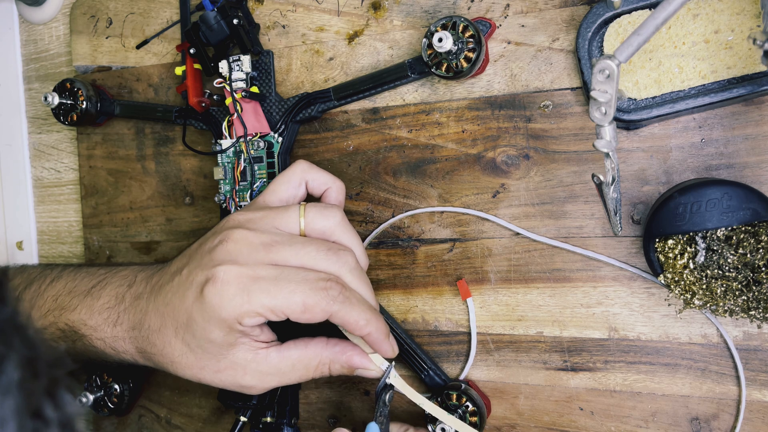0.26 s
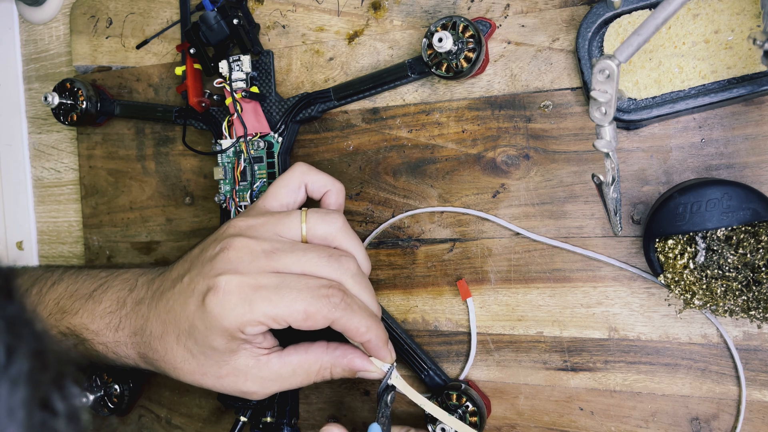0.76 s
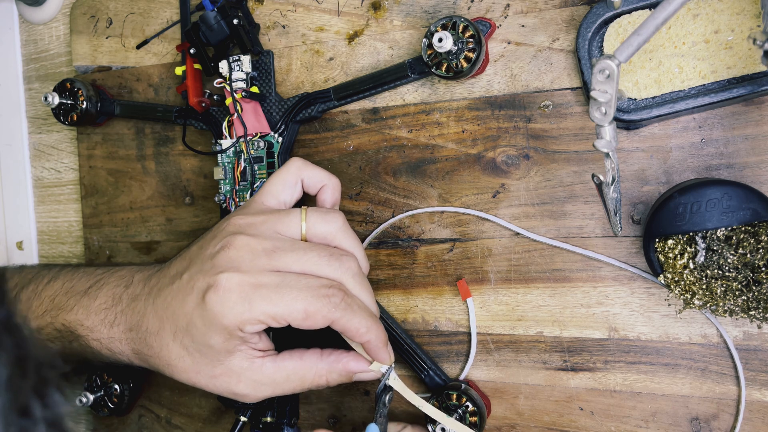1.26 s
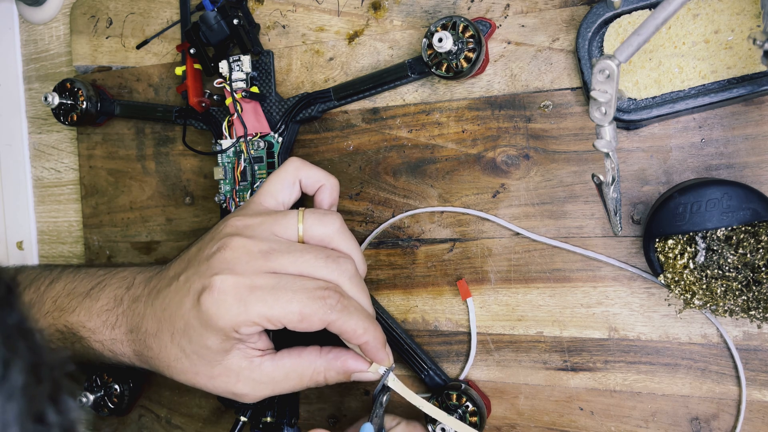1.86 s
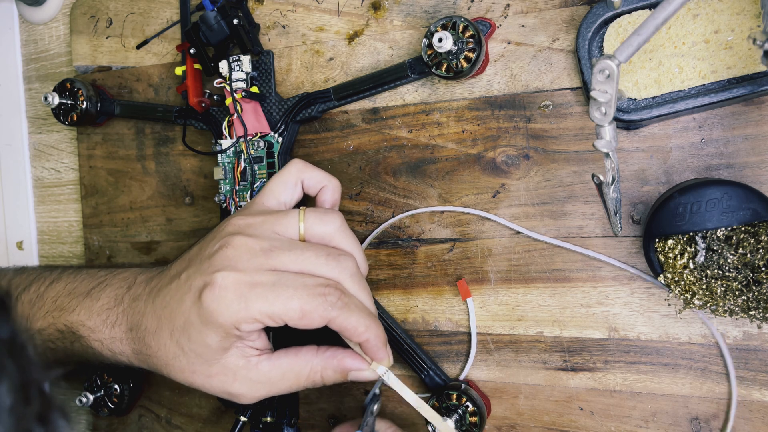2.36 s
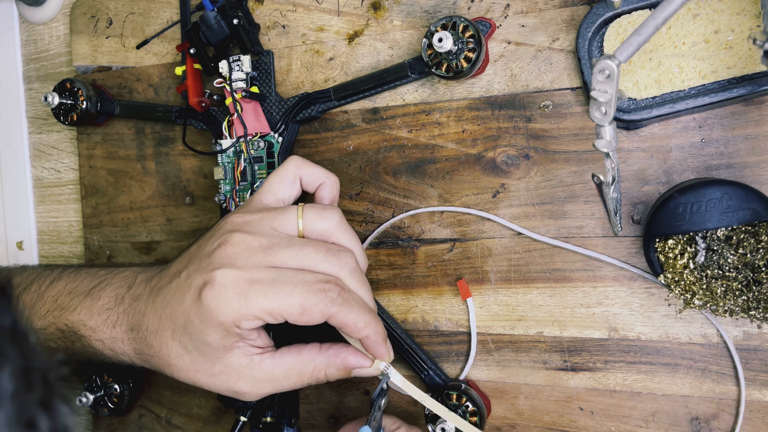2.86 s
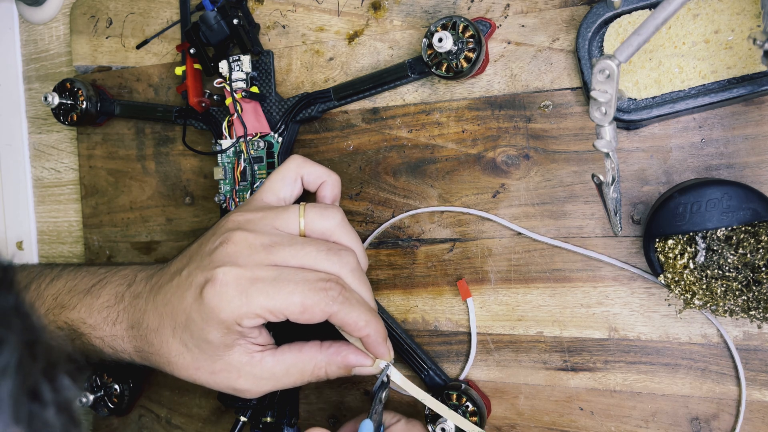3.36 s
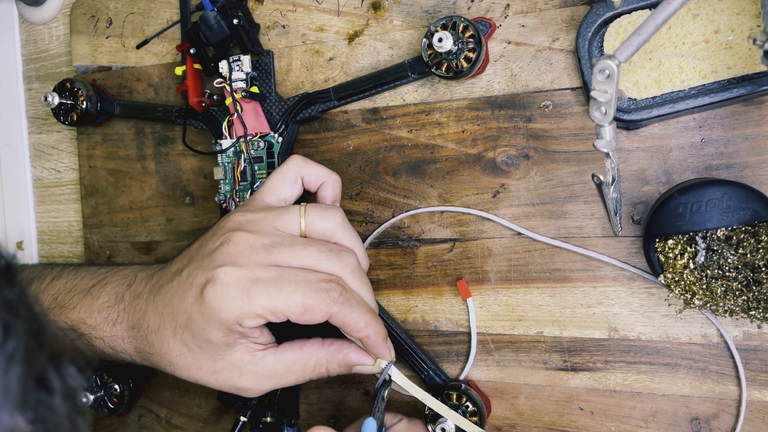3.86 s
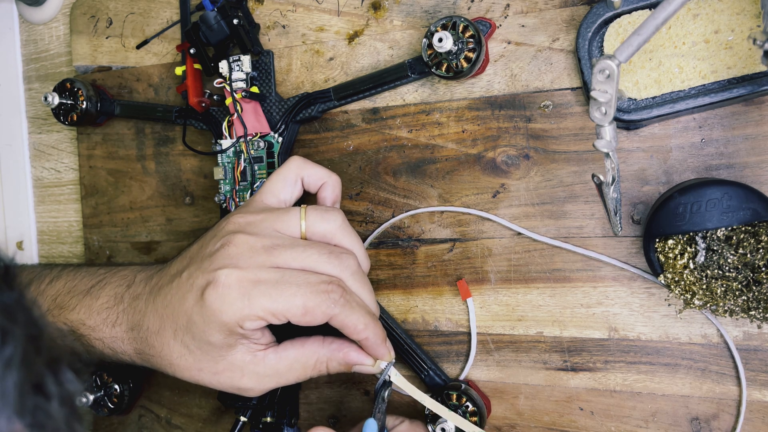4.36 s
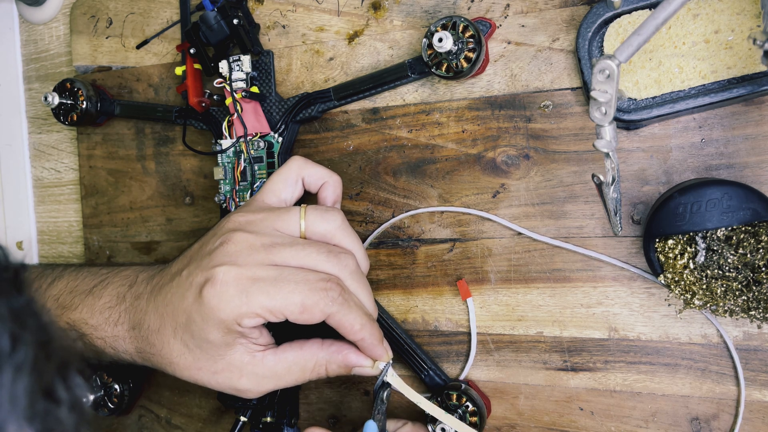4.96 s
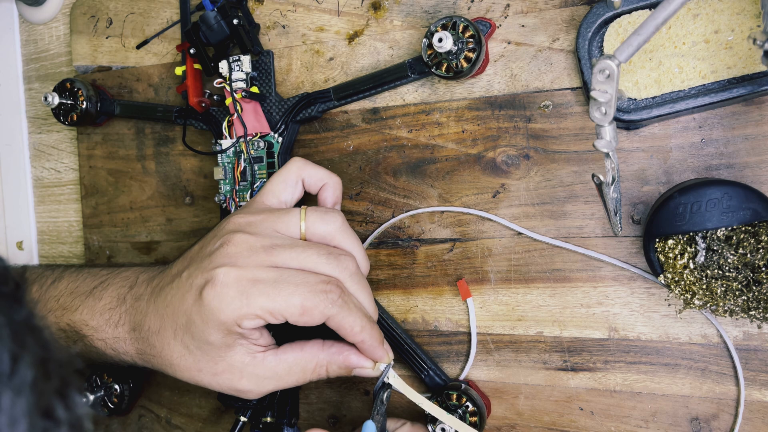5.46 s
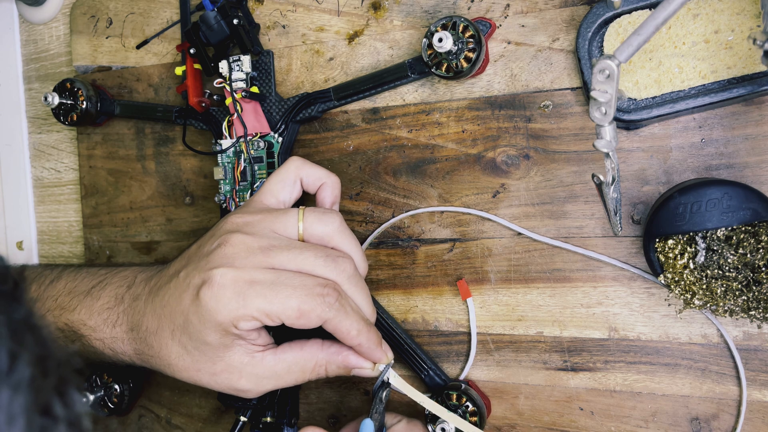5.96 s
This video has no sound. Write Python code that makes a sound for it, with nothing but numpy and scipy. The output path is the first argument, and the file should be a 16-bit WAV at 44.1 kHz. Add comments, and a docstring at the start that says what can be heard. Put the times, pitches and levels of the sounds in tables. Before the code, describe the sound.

A low, slightly throbbing electrical hum and a small fan's whirr run steadily in a quiet workshop. Close to the microphone, steel tweezers tick and tap faintly on a small part, with one sharper click about a second in. A faint slide follows, then soft hand scuffs, bumps and light hollow knocks of a frame on the bench. A few more tiny taps come near the end.

```python
"""Tweezers at a workshop bench

Mains hum and running motors beat against each other in a quiet room, over the whirr of a small fan.
Near the stereo microphone, steel tweezers tick, tap and slide faintly on a part, ringing its modes.
A hand shifts it with soft scuffs and bumps, and its light frame knocks hollowly on the bench.
Ticks, taps and knocks arrive with one reflection off the bench top and a short room tail."""
import sys
import numpy as np
from scipy import signal
from scipy.fft import rfft, irfft, next_fast_len
from scipy.io import wavfile
from scipy.ndimage import uniform_filter1d

SR = 44100
rng = np.random.default_rng(int(sys.argv[2]) if len(sys.argv) > 2 else 0)


def generate_wav(signal):
    """Clip the signal to [-1, 1] and save it as 16-bit WAV at the path in sys.argv[1]."""
    frames = np.transpose(np.atleast_2d(signal))
    scaled = np.clip(frames, -1, 1) * 32767
    pcm = np.round(scaled).astype(np.int16)
    wavfile.write(sys.argv[1], SR, pcm)


N = 274743
TIME = np.arange(N) / SR


def gain_of(db):
    """Decibels to amplitude."""
    return 10 ** (np.asarray(db) / 20)


def unit_rms(x):
    """Scales to an rms of one."""
    return x / np.sqrt(np.mean(x ** 2) + 1e-30)


def curve_at(points, hz):
    """Joins (Hz, value) points on a log-frequency axis."""
    point_hz, value = np.transpose(points)
    return np.interp(np.log(hz + 1), np.log(point_hz + 1), value)


def add(mix, start_s, sound):
    """Mixes a stereo sound in at start_s."""
    span = mix[:, round(start_s * SR):][:, :sound.shape[1]]
    span += sound[:, :span.shape[1]]


def noise(spectrum):
    """Stereo noise of the given dB per Hz, falling steeply above the last point."""
    # likeness of the microphone's two sides, high in the bass: frequency_hz, correlation
    likeness = [(35, 0.7), (150, 1), (270, 0.67), (570, 1), (1200, -0.13), (2200, 0.74), (2900, -0.3),
                (3800, 0.59), (4900, -0.48), (6100, 0.9), (7300, 0.031), (9100, -0.75), (10600, 0.52)]
    size = next_fast_len(N)
    hz = np.fft.rfftfreq(size, 1 / SR)
    colour = gain_of(curve_at(spectrum, hz)) / np.maximum(hz / spectrum[-1][0], 1) ** 10
    mid, side = rfft(rng.standard_normal((2, size))) * np.sqrt(SR) / 2
    correlation = np.clip(curve_at(likeness, hz), -1, 1)
    mid, side = mid * np.sqrt(1 + correlation), side * np.sqrt(1 - correlation)
    return irfft(np.array([mid + side, mid - side]) * colour, size)[:, :N]


def drift(fastest_hz):
    """Slow random wandering of unit rms."""
    rates = np.geomspace(fastest_hz / 10, fastest_hz, num=10)
    return unit_rms(sum(np.sin(2 * np.pi * (hz * TIME + rng.random())) / np.sqrt(hz) for hz in rates))


def hum(waver_rad=0.02, lag_s=0.0001):
    """Nearly pure tones of the mains and motors, whose close spacing makes the hum throb."""
    # the mains (first row), then each motor: rate_hz, [(multiple, rms_db), ...]
    machines = [ (50.025, [(1, -61.9), (2, -36.4)]), (30.08, [(1, -52.8), (1.5, -55.9), (2, -51.3),
                (3, -61.7)]), (29.997, [(16, -68.1), (17, -65)]), (48.18, [(1, -47.7), (3, -64.9)]),
                (38.48, [(2, -53.7), (3, -63.5)]), (33.94, [(2, -61.7)]), (54.43, [(2, -49.6)]),
                (63.0, [(1, -61.6), (2, -61.4), (4, -74.8)])]
    tones = [(rate * multiple, db) for rate, orders in machines for multiple, db in orders]
    phases = rng.uniform(0, 2 * np.pi, len(tones))
    waver = waver_rad * drift(fastest_hz=0.78)
    arrival = TIME + lag_s * np.array([[-1], [1]])  # reaches the right side a little sooner
    return np.sqrt(2) * sum(gain_of(db) * np.sin(2 * np.pi * hz * arrival + phase + waver)
                            for (hz, db), phase in zip(tones, phases))


def room_tone(swell_db=1.06):
    """Machine rumble, the gently swelling whirr of the fan, and hiss."""
    # low noise of the machines: frequency_hz, density_db
    rumble = [(15, -97.5), (28, -79.1), (38, -70.8), (48, -66.1), (75, -68.4), (100, -67.3), (122, -67.5),
              (134, -73.0), (146, -70.4), (166, -69.9), (186, -79), (250, -85.6), (330, -88.2),
              (420, -84.6)]
    # the fan's air noise, peaking in its housing: frequency_hz, density_db
    whirr = [(250, -120), (450, -85.5), (492, -74.5), (552, -71.5), (592, -74.5), (637, -79.5), (692, -86),
             (785, -92), (885, -99.5), (1010, -102.5)]
    # faint hiss: frequency_hz, density_db
    hiss = [(1150, -100.5), (1400, -104.4), (1750, -108.6), (2250, -108.2), (2900, -109.1), (3800, -109.5),
            (4900, -111.6), (5900, -111.9), (7200, -109.7), (8200, -111.8), (9100, -115), (10600, -115),
            (11300, -123)]
    swell = gain_of(swell_db * drift(fastest_hz=6.1))
    return noise(rumble) + swell * noise(whirr) + noise(hiss)


def favour(modes, bright_hz, focus_db):
    """Each mode's share of a contact: down by focus_db per octave squared away from bright_hz."""
    octaves = np.log2(np.transpose(modes)[0] / bright_hz)
    return gain_of(-focus_db * octaves ** 2)


def strike(modes, shares, scrape_ms, spread_rad, grit, rise_ms, pitch=1):
    """A blow and a tiny scrape drive damped modes, each by its share; the click peaks at one."""
    t = np.arange(4096) / SR
    hz, width_hz, db = np.transpose(modes)[:, :, None]
    age = t / (scrape_ms / 1000)
    scrape = rng.standard_normal(len(t)) * age * np.exp(-2 * age)
    force = (t == 0) + grit * scrape / np.linalg.norm(scrape)
    envelope = shares[:, None] * gain_of(db) * np.exp(-np.pi * width_hz * t)
    envelope *= np.minimum(t / (rise_ms / 1000), 1)
    phase = 2 * np.pi * hz * pitch * t
    ring = np.array([(envelope * np.sin(phase + side * spread_rad)).sum(0) for side in (-1, 1)])
    click = signal.fftconvolve(ring, force[None], axes=1)
    return click / abs(click).max()


def reflections(x, echo_s, echo_db, room_db, t60_s):
    """The microphone hears the direct sound, one bounce off the bench top, then the room's tail."""
    t = np.arange(SR // 3) / SR
    tail = rng.standard_normal((2, len(t))) * gain_of(-60 * t / t60_s) * (t > echo_s)
    response = gain_of(room_db) * tail / np.linalg.norm(tail[0])
    response[:, 0] += 1
    response[:, round(echo_s * SR)] += gain_of(echo_db)
    return signal.fftconvolve(x, response, axes=1)[:, :N]


def tweezer_ticks():
    """The steel tips click grittily; the grip shifts their pitch."""
    # clicks of the tips: start_s, dry_peak_db, scrape_ms, bright_hz, focus_db_per_octave2, pitch_ratio
    ticks = [(0.1352, -41.5, 3, 11000, -0.5, 1.02), (0.1428, -37, 1.8, 10000, -2.5, 1.02),
             (0.1495, -41, 2.7, 11000, 3, .975), (1.1029, -23.5, 1, 11600, 34, 1.024),
             (1.109, -43, 1.4, 9500, 6, .99), (2.0855, -55, 1, 7300, 124, 0.93),
             (2.3256, -31, 2.9, 6430, 2, 0.98), (2.347, -46, 2.5, 4000, 8, 1),
             (2.351, -49, 19, 10200, 45, 0.93), (5.663, -45, 2.2, 8050, 52, 0.995)]
    # resonances of the tips: pitch_hz, width_hz, level_db
    tip_modes = [(3150, 400, -11), (4100, 400, -9), (7100, 350, -14), (7900, 330, -6), (9650, 400, -6),
                 (10450, 430, 6), (10950, 420, 4), (12000, 400, -12)]
    out = np.zeros((2, N))
    for start_s, peak_db, scrape_ms, bright_hz, focus_db, pitch in ticks:
        shares = favour(tip_modes, bright_hz, focus_db)
        tick = strike(tip_modes, shares, scrape_ms, spread_rad=0.99, grit=2.7, rise_ms=0.7, pitch=pitch)
        add(out, start_s, gain_of(peak_db) * tick)
    return reflections(out, echo_s=0.0023, echo_db=-9, room_db=-14, t60_s=0.13)


def tweezer_taps():
    """Duller taps on the held part spare modes with a node at the contact; the grip shifts the pitch."""
    # taps along the part: start_s, dry_peak_db, bright_hz, focus_db_per_octave2, place_0_1, pitch_ratio
    taps = [(0.3205, -53.5, 3050, 120, .25, 1.03), (0.724, -38.5, 2500, 6.5, 0.315, 1.01),
            (1.1083, -44, 6100, 60, .29, 1.16), (1.296, -58.5, 3400, 28, 0.25, .92),
            (1.4275, -56.5, 3000, 130, .25, 0.94), (2.0837, -47, 2000, 17, .5, .935),
            (4.653, -38.5, 5600, 2.5, 0.21, 1.018), (4.6926, -46, 3220, 19, 0.37, 0.95),
            (4.818, -54.5, 3500, -2, .4, 1.03)]
    # resonances of the part: pitch_hz, width_hz, level_db
    part_modes = [(2260, 170, -1), (3000, 260, -9), (4030, 340, 4), (4620, 380, 2), (5330, 220, 1),
                  (6380, 480, 6), (6680, 520, 5), (8500, 480, -7)]
    orders = 1 + np.arange(len(part_modes))
    out = np.zeros((2, N))
    for start_s, peak_db, bright_hz, focus_db, place, pitch in taps:
        shares = favour(part_modes, bright_hz, focus_db) * abs(np.sin(np.pi * place * orders))
        tap = strike(part_modes, shares, scrape_ms=0.91, spread_rad=0.53, grit=0.39, rise_ms=1.25,
                     pitch=pitch)
        add(out, start_s, gain_of(peak_db) * tap)
    return reflections(out, echo_s=0.0041, echo_db=-8.5, room_db=-7, t60_s=0.14)


def grains(depth_db, samples):
    """The fast random flutter in level that makes friction grainy."""
    return gain_of(depth_db * unit_rms(uniform_filter1d(rng.standard_normal(N), size=samples)))


def hand_scuffs(rise_share=0.11):
    """The shifting hand rubs in short grainy strokes that rise quickly and fade; the first, brief stroke
    instead gives a loud tick of the tips its low body."""
    # strokes of the hand, after a first brief one that is the low body of the tick at 1.1 s: start_s, length_s,
    # level_db, tilt_db_per_octave
    scuffs = [(1.104, 0.013, -58, -6), (2.089, 0.097, -60.5, 3), (2.196, 0.097, -65, 0),
              (2.323, 0.13, -61.5, 0.5), (2.457, 0.047, -60, -7.5), (2.528, 0.039, -64, -4),
              (2.651, 0.039, -64, 1), (2.715, 0.079, -64, -1.5)]
    # spectrum of the rubbing: frequency_hz, relative_db
    rub = [(130, -10), (250, -13), (420, -16), (770, 3), (1100, 6.5), (1500, 7), (2150, -0.5), (2450, -5),
           (3000, -3.5), (4000, -8)]
    out = np.zeros((2, N))
    roughness = grains(depth_db=2, samples=150)
    for start_s, length_s, db, tilt_db in scuffs:
        corners_s = [start_s, start_s + rise_share * length_s, start_s + length_s]
        stroke = np.sqrt(np.interp(TIME, corners_s, [0, 1, 0]))
        colour = [(hz, level + tilt_db * np.log2(hz)) for hz, level in rub]
        out += gain_of(db) * stroke * unit_rms(roughness * noise(colour))
    return out


def resonate(x, hz, width_hz):
    """A resonance of gain one that follows the curve hz."""
    turn = np.exp(2j * np.pi * np.cumsum(hz) / SR)
    pole = np.exp(-np.pi * width_hz / SR)
    return 2 * (turn * signal.lfilter([1 - pole], [1, -pole], x / turn)).real


def tweezer_slide(width_hz=550):
    """Fine friction grains sing in one resonance of the part, which shifts as the contact moves."""
    # the tips' light path along the part: time_s, level_db, ring_hz
    path = [(1.478, -92, 2150), (1.49, -74.5, 2130), (1.70, -76, 2070), (1.86, -73, 1950),
            (2.07, -71, 2070), (2.11, -68, 2100), (2.24, -73, 2010), (2.31, -73, 1940), (2.56, -89, 2150),
            (2.78, -70.5, 2100), (2.99, -75, 1990), (3.1, -85, 2000), (3.35, -88, 2050)]
    time_s, db, hz = np.transpose(path)
    friction = noise([(1200, 0), (2300, 0)]) * grains(depth_db=4.5, samples=90)
    ring_hz = np.interp(TIME, time_s, hz)
    ring = resonate(resonate(friction, ring_hz, width_hz), ring_hz, width_hz)
    return gain_of(np.interp(TIME, time_s, db, left=-np.inf, right=-np.inf)) * unit_rms(ring)


def hand_bumps():
    """Soft dragging bumps of the hand sound the low modes of the bench top."""
    # the hand meeting the bench: start_s, peak_db, bright_hz, drag_ms
    bumps = [(2.355, -47, 212, 21), (2.385, -46, 310, 25), (2.434, -43.5, 243, 12), (2.458, -40.5, 282, 9),
             (2.474, -49, 245, 15), (2.536, -39, 243, 6.5), (2.723, -43, 293, 9.6), (4.84, -51, 247, 16),
             (5.915, -52, 217, 9)]
    # resonances of the bench top: pitch_hz, width_hz, level_db
    bench_modes = [(202, 46, -2), (249, 41, 4), (288.6, 41.5, -0.5), (407, 47, 3)]
    out = np.zeros((2, N))
    for start_s, peak_db, bright_hz, drag_ms in bumps:
        shares = favour(bench_modes, bright_hz, focus_db=28)
        bump = strike(bench_modes, shares, drag_ms, spread_rad=0.085, grit=1.24, rise_ms=11.3)
        add(out, start_s, gain_of(peak_db) * bump)
    return out


def frame_knocks():
    """The light frame rings hollowly as it shifts on the bench."""
    # the frame meeting the bench: start_s, dry_peak_db, bright_hz
    knocks = [(2.474, -53, 1730), (2.7202, -45, 1100), (2.729, -49, 1000), (2.767, -48.5, 1600)]
    # resonances of the frame: pitch_hz, width_hz, level_db
    frame_modes = [(880, 190, 4), (1100, 200, 0.5), (1436, 220, -6), (2080, 310, -10), (2850, 190, -12)]
    out = np.zeros((2, N))
    for start_s, peak_db, bright_hz in knocks:
        shares = favour(frame_modes, bright_hz, focus_db=13)
        knock = strike(frame_modes, shares, scrape_ms=3.5, spread_rad=0.43, grit=1.05, rise_ms=1.4)
        add(out, start_s, gain_of(peak_db) * knock)
    return reflections(out, echo_s=0.00365, echo_db=-13, room_db=-6.5, t60_s=0.17)


def scene():
    """The steady workshop behind the small, close sounds of the work."""
    return (hum() + room_tone() + tweezer_ticks() + tweezer_taps()
            + hand_scuffs() + tweezer_slide() + hand_bumps() + frame_knocks())


def record(dry, edge_hz=12300):
    """The recorder cuts off the top of the treble."""
    lowpass = signal.firwin(511, edge_hz, window=("kaiser", 9), fs=SR)
    return signal.oaconvolve(dry, lowpass[None], "same")


dry = scene()
out = record(dry)
generate_wav(out)
```